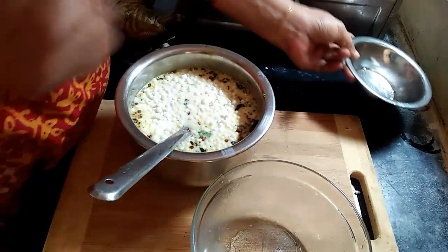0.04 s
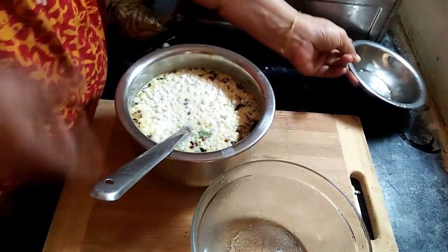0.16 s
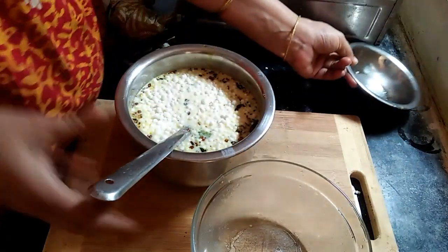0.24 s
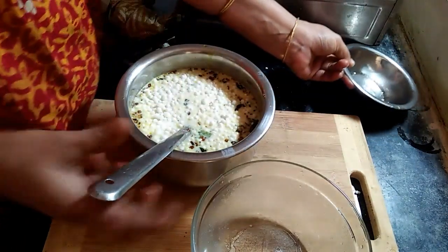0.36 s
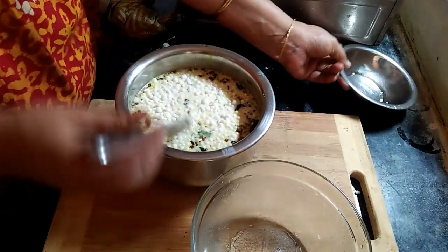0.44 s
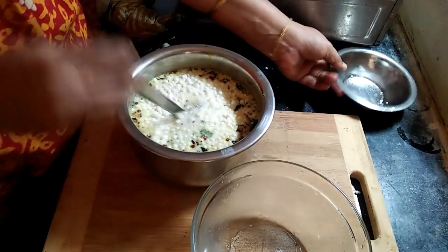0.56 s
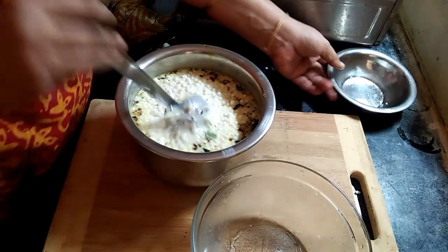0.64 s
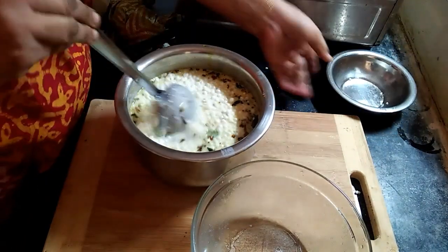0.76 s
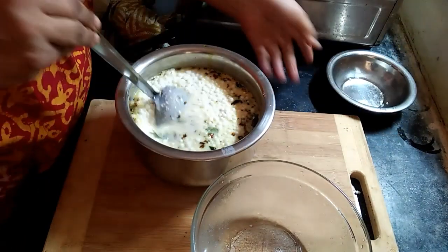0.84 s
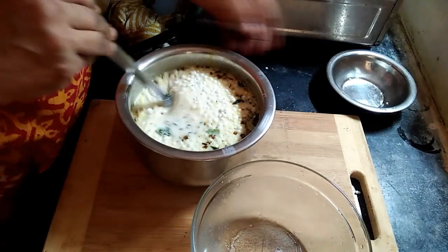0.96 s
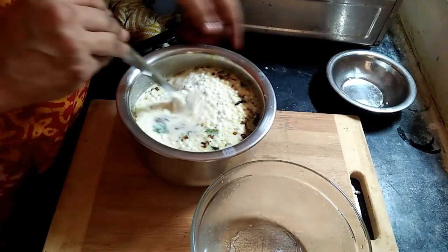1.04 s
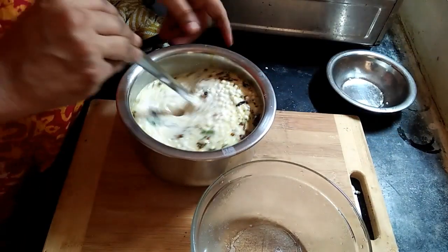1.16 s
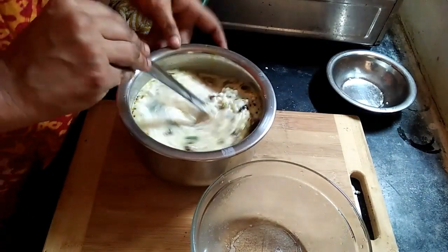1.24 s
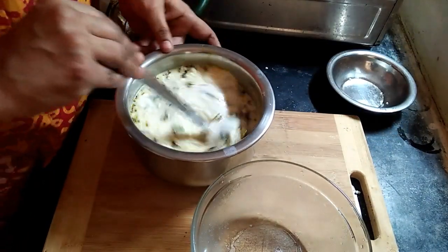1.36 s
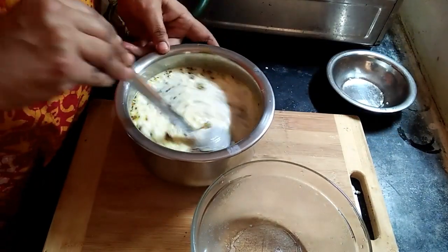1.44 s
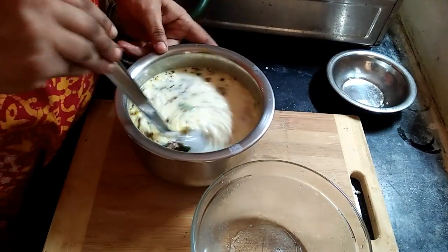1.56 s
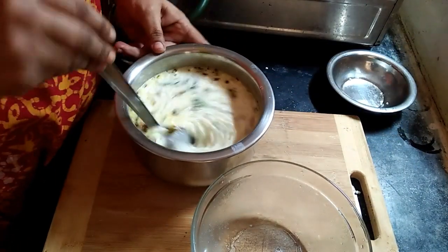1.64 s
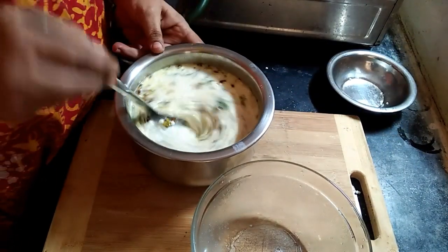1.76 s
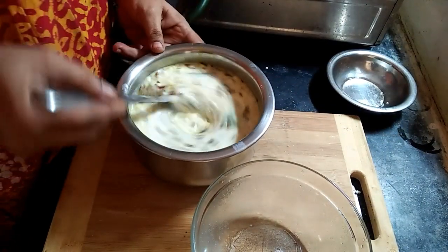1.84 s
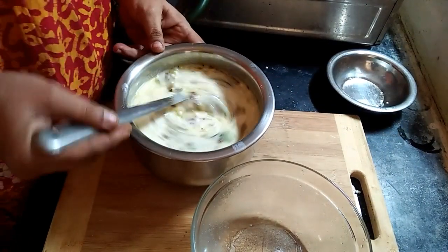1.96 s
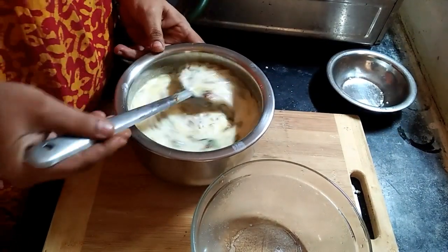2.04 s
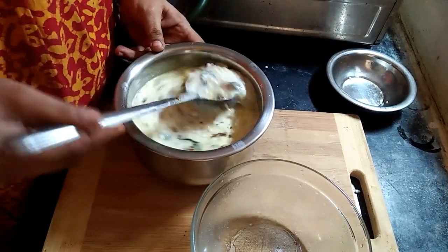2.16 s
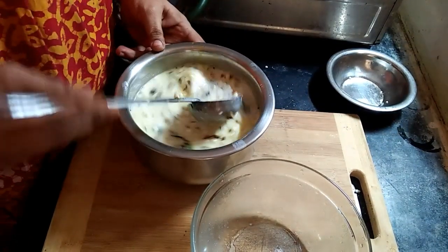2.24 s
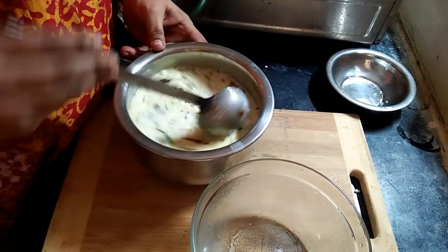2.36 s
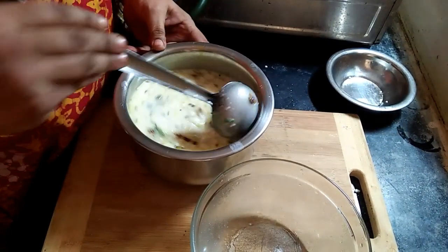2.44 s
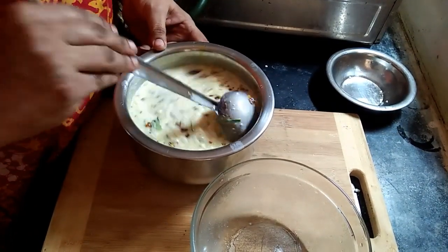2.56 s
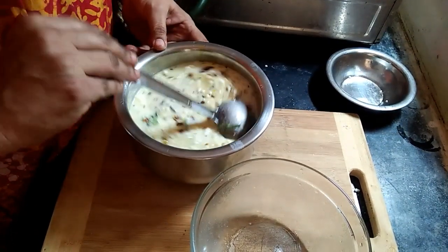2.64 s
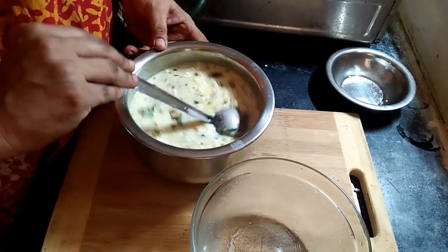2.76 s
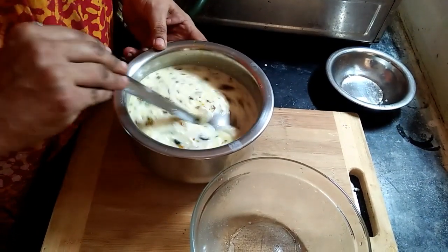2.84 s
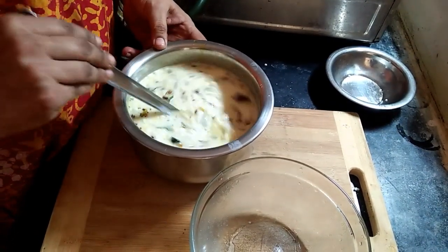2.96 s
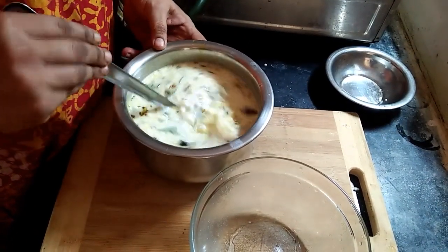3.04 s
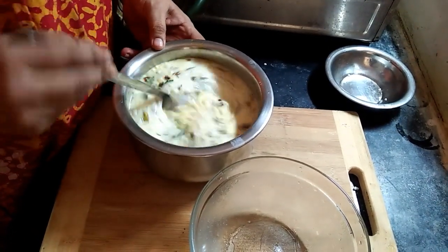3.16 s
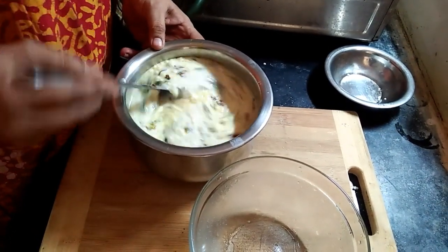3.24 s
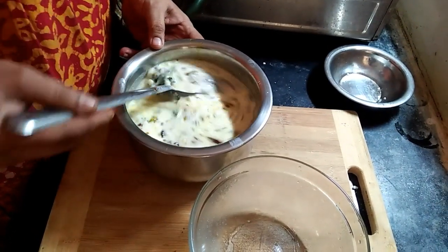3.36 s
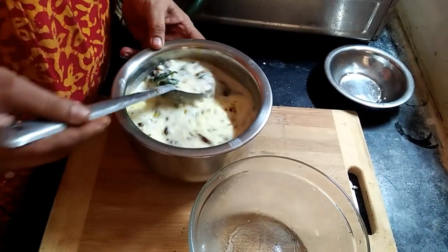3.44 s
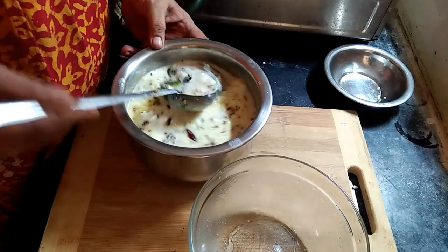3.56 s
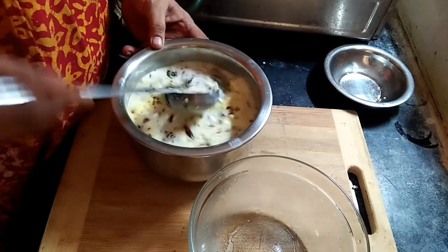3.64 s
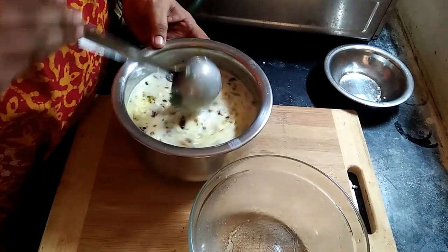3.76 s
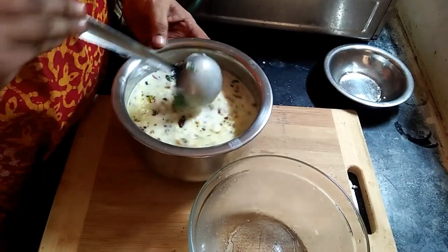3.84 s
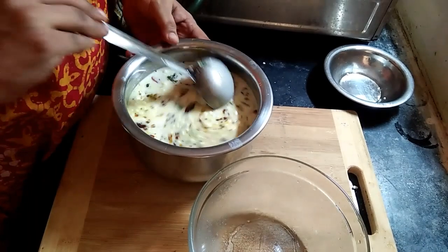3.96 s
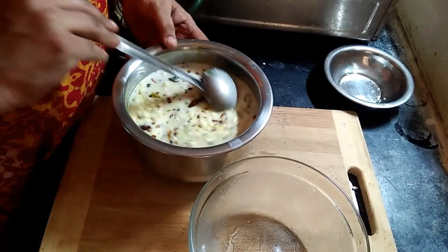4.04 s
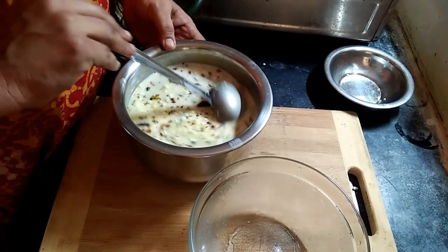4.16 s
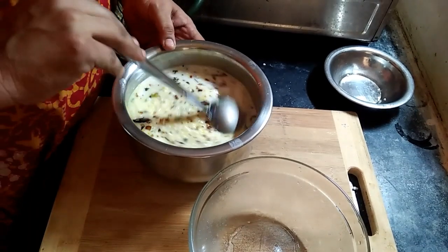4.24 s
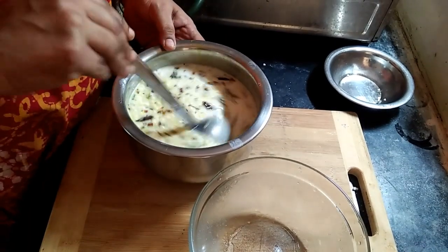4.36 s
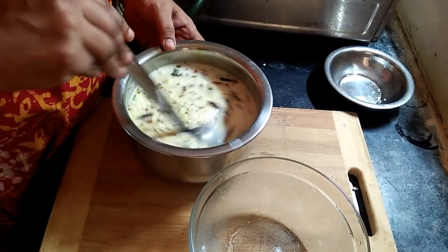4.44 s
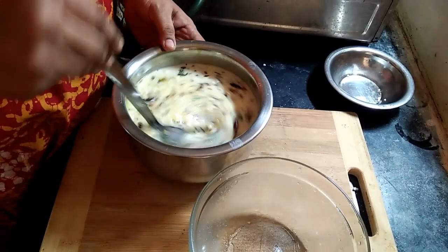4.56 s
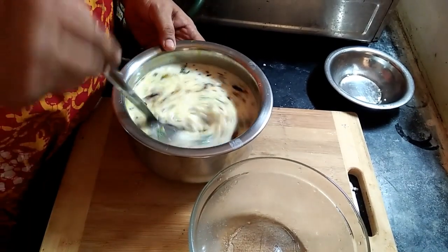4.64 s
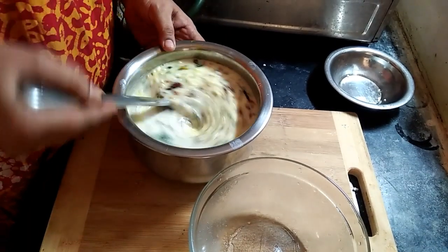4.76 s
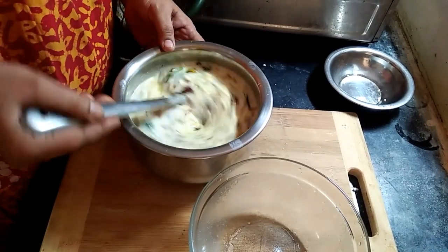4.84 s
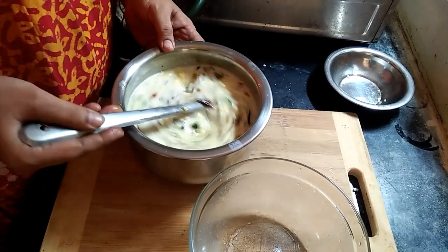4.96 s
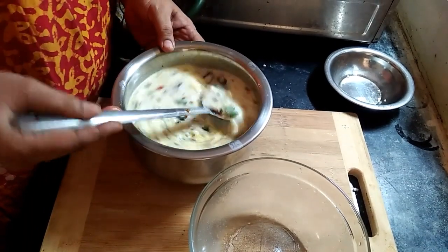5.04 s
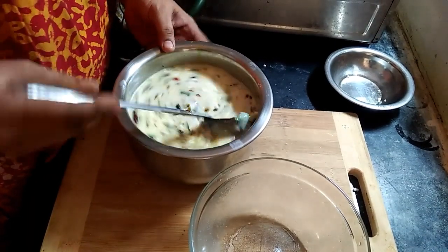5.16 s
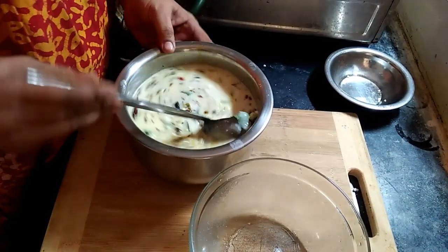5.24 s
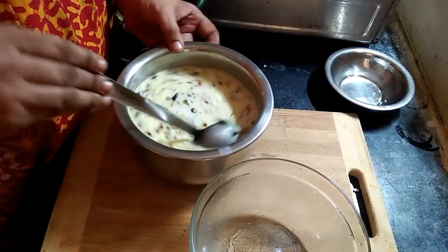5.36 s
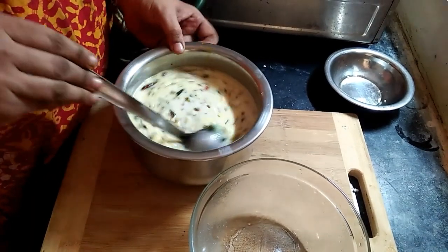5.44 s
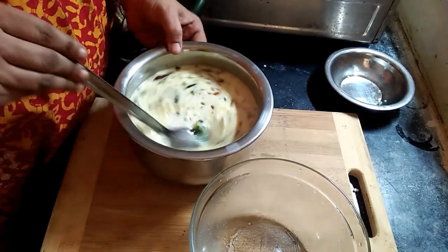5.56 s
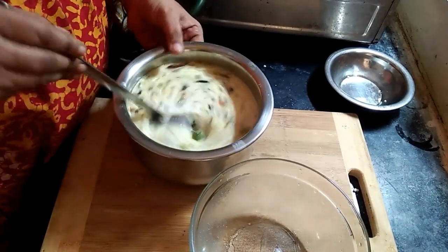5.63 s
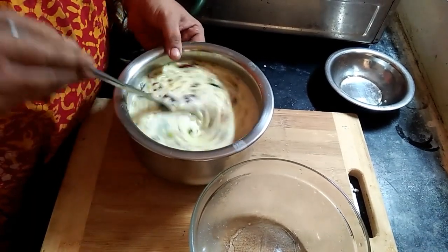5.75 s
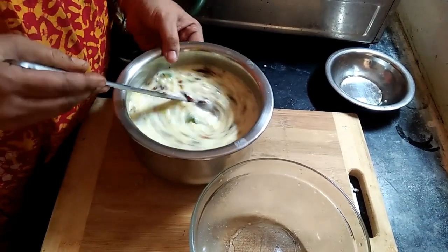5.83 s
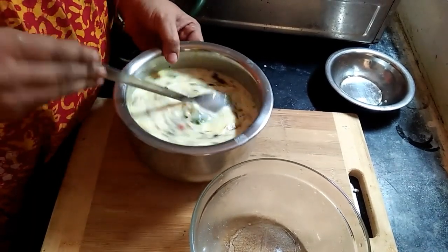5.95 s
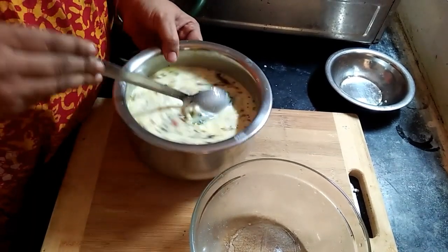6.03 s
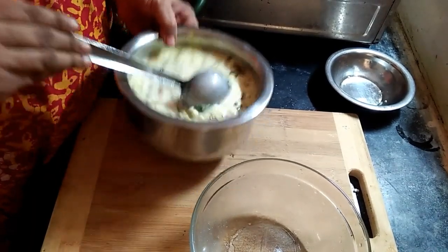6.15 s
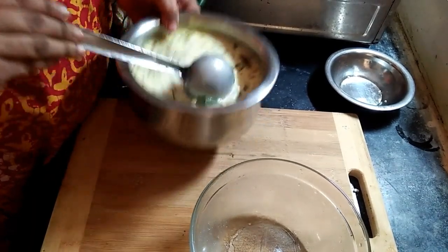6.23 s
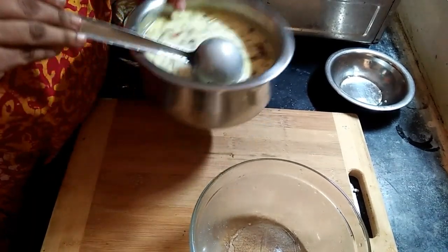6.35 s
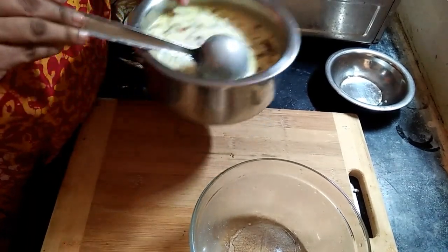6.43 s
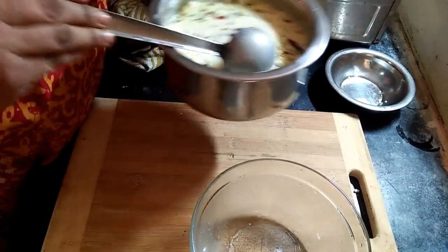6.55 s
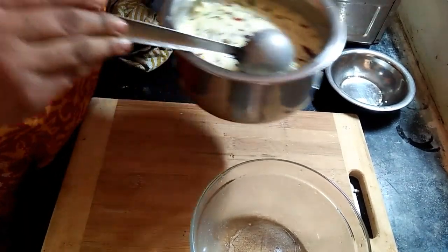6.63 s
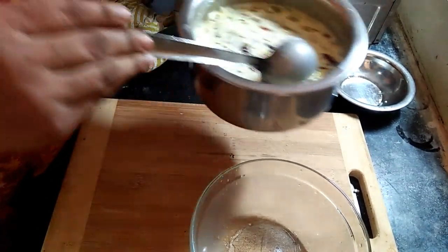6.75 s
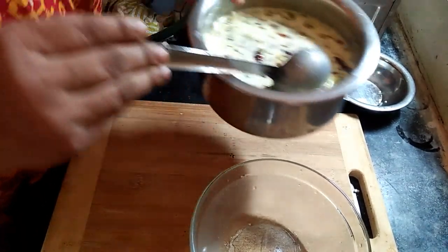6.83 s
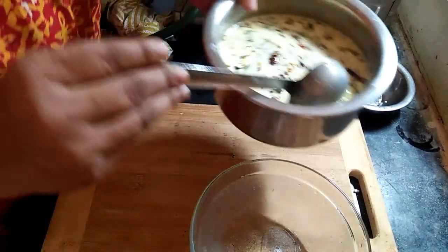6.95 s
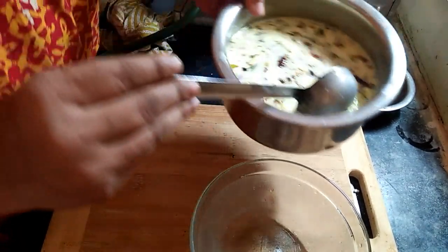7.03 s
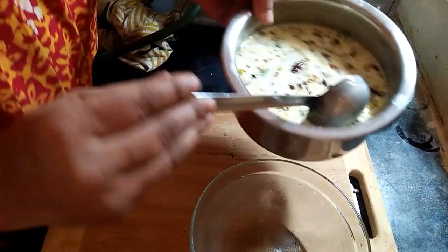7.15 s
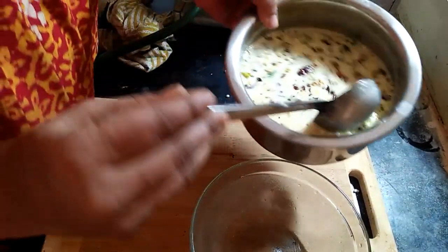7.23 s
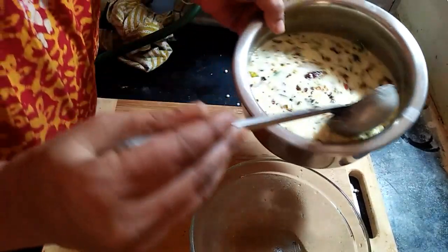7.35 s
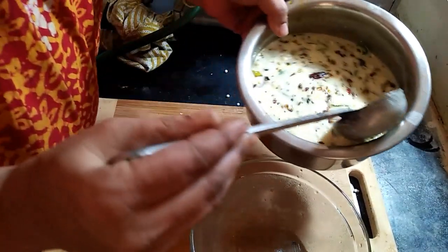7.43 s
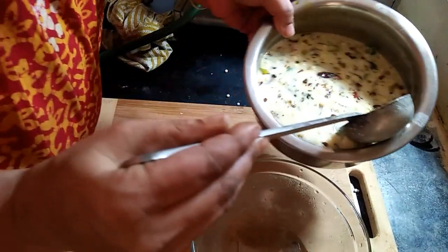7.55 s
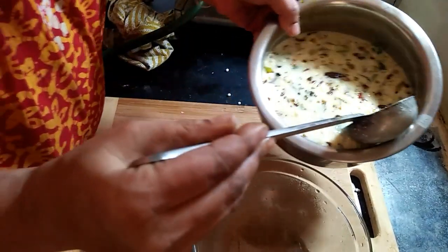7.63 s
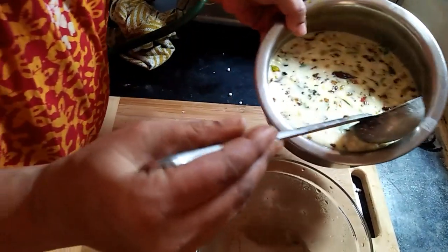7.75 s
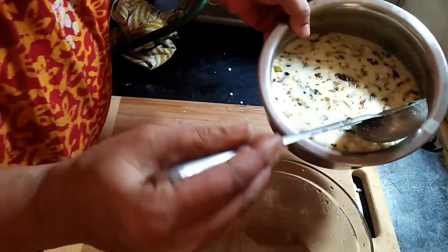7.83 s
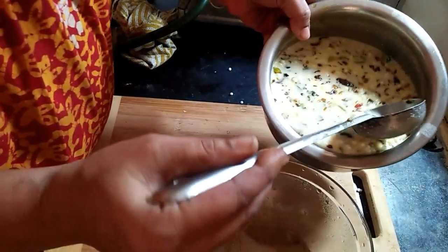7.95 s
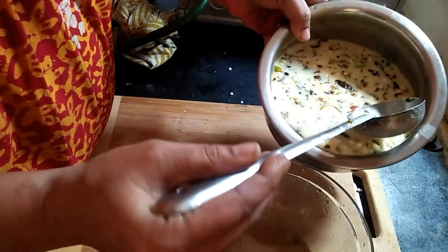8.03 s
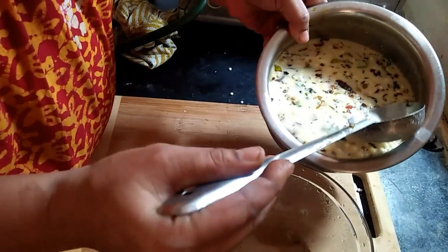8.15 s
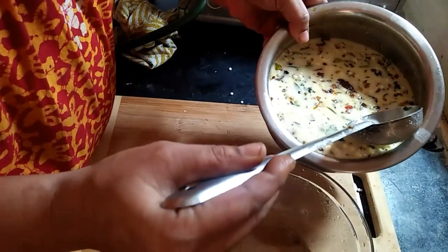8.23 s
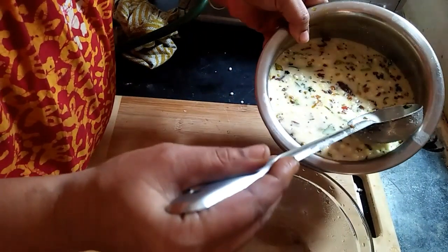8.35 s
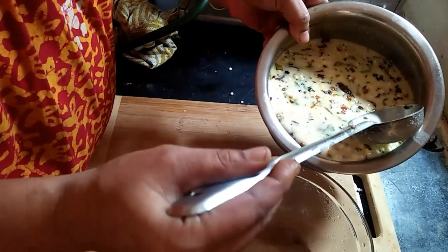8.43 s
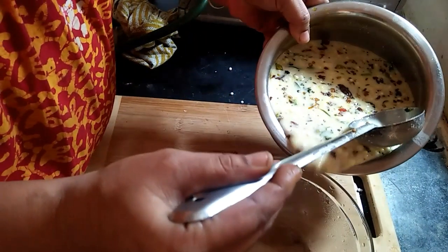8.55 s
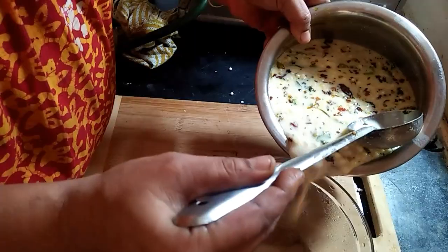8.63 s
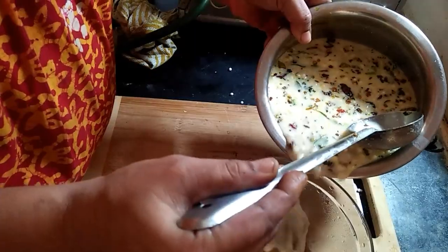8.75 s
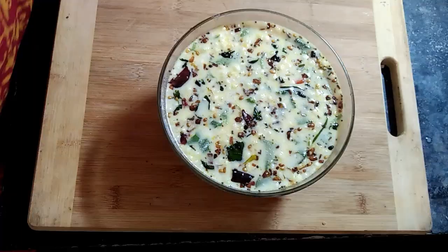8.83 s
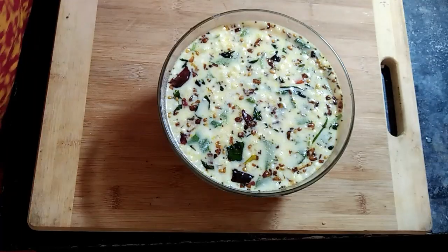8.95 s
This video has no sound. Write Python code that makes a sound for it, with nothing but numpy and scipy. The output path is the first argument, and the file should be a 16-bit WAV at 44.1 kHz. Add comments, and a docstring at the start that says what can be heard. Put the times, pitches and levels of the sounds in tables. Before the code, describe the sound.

Soft sleeve rustle, then a small empty steel dish lands with a rapid ringing clatter. A steel ladle knocks a full pot and stirs thin curry with gritty scrapes, wet plops and swishing, including one hard groaning scrape. It calms, the handle taps the rim, and the lifted pot clunks and clinks before the sound fades. Close microphone in a small hard kitchen, with faint hum and hiss.

```python
"""A rustle of sleeve and hand, then a small steel dish is set down on a counter: decaying modes and short clatter.
A steel ladle stirs thin curry in a steel pot: struck modes knock, rough noise scrapes and groans along the wall,
gliding sine bubbles plop and dribble, and coloured noise washes. The handle taps the rim; late on the pot,
in the hand, clunks as it is tipped to pour and the stem slides on the rim.
Decaying noise echoes it as a small hard room over hum, rumble and hiss; everything fades out at the end."""
import sys
import numpy as np
from scipy import signal
from scipy.fft import rfft, irfft, next_fast_len
from scipy.io import wavfile
from scipy.ndimage import uniform_filter1d

SR = 44100
rng = np.random.default_rng(int(sys.argv[2]) if len(sys.argv) > 2 else 0)


def generate_wav(signal):
    """Clip the signal to [-1, 1] and save it as 16-bit WAV at the path in sys.argv[1]."""
    frames = np.transpose(np.atleast_2d(signal))
    scaled = np.clip(frames, -1, 1) * 32767
    pcm = np.round(scaled).astype(np.int16)
    wavfile.write(sys.argv[1], SR, pcm)


N = 396190
T = np.arange(N) / SR

# Ring modes of the full pot on its board: f/Hz, relative level/dB, full-length t60/s
POT_MODES = [(313, -23.5, 1), (433, -35.5, 0.23), (622, -12, 0.22), (657, -18.5, 0.22), (896, 0, 0.39),
             (1065, -20.5, 0.16), (1220, -5, 0.11), (1447, -18, 0.3), (1650, -18.5, 0.11),
             (2124, -1.5, 0.22), (2310, -6, 0.16), (2510, -23, 0.097), (3070, -28, 0.24),
             (3970, -36.5, 0.15), (5300, -37, 0.29), (5630, -39.5, 0.2), (5770, -32.5, .25),
             (7340, -35.5, .25), (8600, -39, .22), (10000, -34, 0.27), (9750, -34, .2)]
# Bending modes of the ladle's stem, damped by the hand: f/Hz, relative level/dB, full-length t60/s
STEM_MODES = [(1484, -2, 0.26), (1596, -4.5, .18), (2770, -9.5, 0.29), (4180, -10, .24),
              (4230, -15.5, 0.16), (5940, -14, 0.16), (5680, -20.5, 0.36), (9700, -25, 0.25),
              (11410, -21, 0.16), (11400, -27, .17)]
# Low background: t/s, hum level/dB, rumble level/dB
LOW_LEVELS = [(0, -62, -61), (.6, -61, -64), (1.3, -66, -70), (2.1, -72, -75), (2.8, -65, -68),
              (3.5, -66, -70), (4.3, -64, -63), (4.9, -59, -65), (5.8, -65, -68), (6.3, -73, -74),
              (6.7, -62, -72), (7.3, -61, -73), (7.7, -69, -72), (8.6, -60, -68)]


def undb(db):
    """Decibels to gain."""
    return 10 ** (np.asarray(db) / 20)


def unit(x):
    """Scale to rms 1."""
    return x / np.sqrt(np.mean(x ** 2))


def curve(rows, axis=1):
    """Draw one column of a (t/s, ..) table as a line through every sample."""
    rows = np.array(rows)
    return np.interp(T, rows[:, 0], rows[:, axis])


def add(out, s, x):
    """Mix x in from time s on."""
    i = int(s * SR)
    out[i:i + len(x)] += x[:N - i]


def colour(x, points, tilt_db=0):
    """Filter by a (f/Hz, level/dB) spectrum with an extra tilt per octave; causal, rms 1."""
    hz, db = np.transpose(points)
    size = 2 * next_fast_len(len(x) // 2 + 1, True)
    octave = np.log2(np.maximum(np.fft.rfftfreq(size, 1 / SR), 1))
    gain_db = np.interp(octave, np.log2(hz), db + tilt_db * np.log2(hz / hz[0]))
    gain_db -= 20 * np.maximum(np.log2(hz[0]) - octave, 0)  # roll-off below the lowest point
    # folding the cepstrum gives minimum phase, so nothing sounds ahead of its cause
    cepstrum = irfft(np.log(undb(gain_db)))
    cepstrum[1:size // 2] *= 2
    cepstrum[size // 2 + 1:] = 0
    response = np.exp(rfft(cepstrum))
    return unit(irfft(rfft(x, size) * response)[:len(x)])


def noise(points, tilt_db=0, size=N):
    """Coloured noise, rms 1."""
    return colour(rng.standard_normal(size), points, tilt_db)


def decay(t, t60):
    """Falls 60 dB in t60 seconds."""
    return np.exp(-np.log(1000) * t / max(t60, 1 / SR))


def swell(s, rise, t60):
    """Builds to a crest at time s, then dies away."""
    build = np.exp(-(np.minimum(T - s, 0) / rise) ** 2)
    return build * decay(np.clip(T - s, 0, 2), t60)


def walk(rate):
    """Slow chance with a spread near 1, turning at random points, rate of them a second."""
    knots = rng.standard_normal(1024)
    return np.interp(T * rate, np.arange(len(knots)), knots)


def ring(modes, t, length=1, tilt_db=0):
    """Decaying partials; a harder contact tilts them up, a longer contact damps them."""
    total = np.zeros(len(t))
    for hz, db, t60 in modes:
        level = undb(db + tilt_db * np.log2(hz / 1000))
        total += level * decay(t, t60 * length) * np.sin(2 * np.pi * hz * t)
    return total


def blows(hits, modes, spectrum, contact_s=0.00084):
    """Each blow starts the long ring and a short clatter of crowded modes, returned as two layers."""
    rings, clatter, t = np.zeros(N), np.zeros(N), T[:SR]
    push = 1 - np.exp(-t / contact_s)
    for s, ring_db, length, ring_tilt_db, clatter_db, t60, tilt_db in hits:
        add(rings, s, undb(ring_db) * push * ring(modes, t, length, ring_tilt_db))
        crowded = noise(spectrum, tilt_db, size=SR)
        add(clatter, s, undb(clatter_db) * push * decay(t, t60) * crowded)
    return np.array([rings, clatter])


def dish_blows():
    """The empty steel dish lands in a few quick blows that excite its modes."""
    # Ring modes: f/Hz, relative level/dB, full-length t60/s
    modes = [(330, -21.5, 0.35), (729, -5, 0.59), (1255, -15, 0.3), (1324, -5, 0.29), (2147, -11.5, 0.2),
             (2690, -27.5, 0.11), (4624, -53.5, 0.15), (5217, -35, 0.38), (6070, -33, 0.24),
             (6455, -37, 0.33), (7768, -50, 0.32), (9080, -39, 0.28), (9905, -44, 0.23), (9600, -41, 0.23),
             (11000, -36, 0.18), (11650, -44, 0.27), (13000, -46.5, 0.26), (13790, -40, 0.17)]
    # Clatter spectrum: f/Hz, relative level/dB
    spectrum = [(120, -68), (200, -55.5), (328, -14), (579, -21.5), (722, -8.5), (821, -17.5),
                (1230, -10.5), (1320, -1.5), (1420, -6.5), (1870, -24), (2170, -9), (3190, -35),
                (7410, -48), (10900, -45.5), (16000, -50)]
    # Blows: t/s, ring level/dB, ring length/share of t60, ring tilt/dB per octave,
    # clatter level/dB, clatter t60/s, clatter tilt/dB per octave
    hits = [(.376, -47.5, 1, -12, -46.5, 0.04, 0), (.383, -23.5, 1, 0, -26.5, 0.19, 1),
            (.392, -31.5, 1, 1, -34, 0.1, -1), (.403, -45, 0.81, 1.5, -31, .08, 3.5),
            (.417, -31, 0.74, 0, -34, 0.092, -5.5), (.4245, -27.5, 0.93, -0.5, -32.5, 0.12, 1),
            (.4305, -26.5, 1, 2, -41.5, 0.23, 5.5)]
    return blows(hits, modes, spectrum)


def pot_blows():
    """Knocks on the full pot on its board ring the pot's own modes."""
    # Clatter spectrum: f/Hz, relative level/dB
    spectrum = [(200, -37), (340, -2.5), (400, -13), (620, -5.5), (900, 6), (1250, 4.5), (1800, -10),
                (2200, -3.5), (3200, -23), (4300, -27.5), (7500, -28), (13000, -26.5), (16000, -39.5)]
    # Blows: t/s, ring level/dB, ring length/share of t60, ring tilt/dB per octave,
    # clatter level/dB, clatter t60/s, clatter tilt/dB per octave
    hits = [(.777, -66, 0.45, 13, -45.5, 0.14, 5), (.7905, -26.5, 0.77, 1, -28, 0.15, 1.5),
            (.808, -46, 0.91, 4, -35, 0.13, -3), (1.0425, -39, 0.24, 4.5, -39.5, 0.061, 4),
            (1.483, -55, 0.5, -6.5, -48, 0.033, 0.5), (4.739, -52, 0.76, -4.5, -51, 0.038, -11),
            (5.472, -58.5, 0.52, -2.5, -55.5, 0.093, -2.5), (6.279, -64.5, 0.46, 2.5, -56, 0.12, -2),
            (6.714, -67.5, 0.38, -6, -60, 0.051, 5)]
    return blows(hits, POT_MODES, spectrum)


def held_pot_blows():
    """In the hand the pot has another set of modes, heard as it clunks when tipped to pour."""
    # Ring modes: f/Hz, relative level/dB, full-length t60/s
    modes = [(329, -5.5, 0.57), (433, -4.5, 0.63), (610, -17.5, 0.48), (739, -1, 1.49), (865, -11.5, 0.18),
             (950, 4, 0.16), (1532, -7.5, 1.54), (1574, -24, 0.32), (2660, -23.5, 0.57), (3300, -42, 0.74),
             (4095, -31, 0.68), (4620, -34, 0.817), (5370, -41, 1.5), (5700, -33, 0.41), (7000, -51, 0.34),
             (8489, -53.5, .7), (10400, -36, 0.41), (11300, -44, 0.35), (11900, -40.5, 0.46)]
    # Clatter spectrum: f/Hz, relative level/dB
    spectrum = [(200, -38), (330, -19), (380, -10), (440, -12.5), (530, -14), (640, 4), (940, 0.5),
                (1300, -15.5), (1750, -12), (2300, -34.5), (4200, -39.5), (13000, -49), (16000, -51)]
    # Blows: t/s, ring level/dB, ring length/share of t60, ring tilt/dB per octave,
    # clatter level/dB, clatter t60/s, clatter tilt/dB per octave
    hits = [(7.522, -68, 0.15, 2, -27, 0.026, -11), (7.5285, -44, 0.58, 2.5, -21, 0.074, 0),
            (7.549, -54.5, 0.54, -6, -40, 0.041, 1), (7.558, -61, 0.16, -3, -43.5, 0.063, 4),
            (7.586, -67, 0.19, -9, -40, 0.048, 2), (8.046, -58, 0.048, -20, -51, .04, -1),
            (8.0525, -31.5, 0.24, 3.5, -38.5, 0.3, 3.5), (8.076, -37, 0.14, -0.5, -55.5, 0.07, -1),
            (8.471, -46.5, 0.16, -2.5, -47.5, 0.14, 2.5)]
    return blows(hits, modes, spectrum)


def ladle_blows():
    """The ladle's cup answers its own knocks with mostly short modes."""
    # Ring modes: f/Hz, relative level/dB, full-length t60/s
    modes = [(1000, -2.5, 0.56), (1140, 1.5, 0.072), (1240, -3.5, .16), (1620, -16, .08), (2500, -14, .08),
             (4140, -16.5, .08), (5600, -14.5, .12), (6450, -11.5, 0.11), (7240, -16.5, .12)]
    # Clatter spectrum: f/Hz, relative level/dB
    spectrum = [(200, -37.5), (480, -28.5), (680, -21), (1000, 12.5), (1230, 7), (1550, -9), (2200, -10),
                (3100, -12), (4300, -13.5), (5600, -6.5), (6900, -8.5), (7700, -21.5), (13000, -26.5),
                (16000, -33)]
    # Blows: t/s, ring level/dB, ring length/share of t60, ring tilt/dB per octave,
    # clatter level/dB, clatter t60/s, clatter tilt/dB per octave
    hits = [(1.585, -65, 0.84, 7, -54, 0.024, 5), (1.7235, -45.5, 0.66, 1.5, -23.5, 0.049, 0),
            (3.244, -51.5, .4, -7, -27.5, 0.024, 0.5), (3.2495, -70, 0.6, 5, -39.5, 0.018, 0.5),
            (6.279, -57, 1, -10, -58, 0.4, -8)]
    return blows(hits, modes, spectrum)


def stem_blows():
    """Knocks set off the bending modes of the ladle's stem."""
    # Clatter spectrum: f/Hz, relative level/dB
    spectrum = [(500, -33.5), (1300, -10), (1580, 19.5), (1950, 4.5), (2500, -13), (2750, 6), (3100, -20),
                (3850, -12.5), (4200, -11), (4700, -29.5), (5350, -9), (5780, 2), (6500, -22.5),
                (9000, -11), (11400, -9), (16000, -34)]
    # Blows: t/s, ring level/dB, ring length/share of t60, ring tilt/dB per octave,
    # clatter level/dB, clatter t60/s, clatter tilt/dB per octave
    hits = [(1.0425, -43, 0.37, 3, -37.5, 0.079, -7), (1.585, -77.5, 0.47, 3, -53, 0.12, 13.5),
            (8.0525, -27.5, 1, -10.5, -33, 0.12, -0.5), (8.076, -33, 0.62, -16, -43.5, 0.26, -1),
            (8.471, -51.5, 0.99, -4, -47.5, 0.12, -0.5)]
    return blows(hits, STEM_MODES, spectrum)


def rim_blows():
    """The handle taps the rim and sets off short bright modes."""
    # Ring modes: f/Hz, relative level/dB, full-length t60/s
    modes = [(1150, -4, 0.076), (2010, -6, 0.15), (2266, 0, 0.16), (2880, -11.5, 0.14), (3060, -2, 0.12),
             (3175, -12.5, 0.24), (3145, -8, 0.16), (3350, -15.5, 0.18), (5160, -13, .09), (6930, -13, .14)]
    # Clatter spectrum: f/Hz, relative level/dB
    spectrum = [(150, -48), (250, -41), (468, -12.5), (607, -24), (1180, -8.5), (1670, -30.5), (1950, -5.5),
                (2530, -11), (3060, -4), (4410, -31.5), (5350, -18), (7840, -31), (10200, -25.5),
                (14200, -33), (16000, -56)]
    # Blows: t/s, ring level/dB, ring length/share of t60, ring tilt/dB per octave,
    # clatter level/dB, clatter t60/s, clatter tilt/dB per octave
    hits = [(3.944, -71.5, 0.62, 6, -55.5, 0.026, 6), (6.44, -45.5, 0.94, -4, -34, 0.033, 0),
            (6.446, -60.5, .6, 6, -51.5, 0.25, 3), (6.5575, -48.5, 0.45, -1, -47, 0.076, -1.5)]
    return blows(hits, modes, spectrum)


def pressure(start, length, hardest, let_go_t60=0.18, grip_s=0.0063, ease_db=12):
    """One stroke: the steel grips, presses harder, eases off and lets go."""
    t = T - start
    top = length * np.clip(hardest, .05, .95)
    lean = np.interp(t, [0, top, length], [1, 0, 1])  # the ends are ease_db softer than the top
    grip = np.clip(t / grip_s, 0, 1)
    return grip * undb(-ease_db * lean) * decay(np.clip(t - length, 0, 1), let_go_t60)


def wander(x, count=22):
    """As the contact point travels, each narrow band of the steel answers now more, now less."""
    edges = np.geomspace(1200, 16000, count + 1)
    size = 2 ** 19
    spectrum, hz = rfft(x, size), np.fft.rfftfreq(size, 1 / SR)
    band = np.searchsorted(edges[1:-1], hz)
    total = np.zeros(N)
    for k in range(count):
        depth_db = 3.5 * (2500 / max(edges[k], 2500)) ** .4  # shallower in the treble
        total += irfft(spectrum * (band == k))[:N] * undb(depth_db * walk(30))
    return unit(total)


def grit(centre_hz=4400, spread_octaves=.45, count=9000):
    """Spice grains crushed under the ladle: crowded brief pings of scattered pitch and size."""
    out, t = np.zeros(N), T[:SR // 60]
    for when, size, pitch in zip(rng.random(count), rng.random(count), rng.standard_normal(count)):
        hz = centre_hz * 2 ** (spread_octaves * pitch)
        add(out, when * T[-1], size ** 3 * decay(t, .016) * np.sin(2 * np.pi * hz * t))
    return unit(out)


def scrapes(hiss_db=-1, rasp_db=-1, pot_db=-7, grit_db=-8, wall_db=-1, grain_db=4, judder_db=2.5):
    """Steel slips on steel in dense tiny catches that hiss and keep the pot and the stem ringing."""
    # Strokes along the wall: start t/s, length/s, hardest point/share of length,
    # hiss level/dB and rasp level/dB, both ahead of the layer trims
    strokes = [(0.022, 0.14, 0.21, -70.5, -67.5), (0.653, 0.3, 0.08, -70, -74.5),
               (0.954, 0.044, 0, -69, -64), (1.048, .075, 0.17, -53, -51), (1.132, 0.2, 0.4, -72, -74.5),
               (1.344, 0.086, 1, -63, -65), (1.479, 0.34, 0.55, -56.5, -66), (1.763, 0.21, 1, -62.5, -67.5),
               (2.033, 0.12, 0.52, -60.5, -65.5), (2.667, 0.12, 0.91, -64, -66.5),
               (2.866, 0.036, 0.7, -73, -61), (3.009, 0.14, 0.26, -52.5, -59),
               (3.08, 0.35, 0.24, -49.5, -62.5), (3.244, .025, 0.2, -53, -44),
               (3.327, 0.098, 0.36, -82, -58.5), (4.601, 0.24, 0.58, -57, -61.5),
               (4.922, 0.023, 0.4, -66.5, -72), (5.785, 0.084, 0.45, -67.5, -65)]
    # The stem slides on the rim: start t/s, length/s, hardest point/share of length, level/dB,
    # t60/s once the hand stops it
    stem_slide = (8.14, .14, .62, -62.5, .06)
    # Hiss spectrum: f/Hz, relative level/dB
    hiss_colour = [(1200, -30.5), (2800, -19.5), (3250, -1), (3800, 1.5), (4200, 7), (4550, -2.5),
                   (5000, 1.5), (5700, 6), (7200, -1.5), (11000, 4.5), (13700, -1.5), (15800, -14.5)]
    # Rasp spectrum: f/Hz, relative level/dB
    rasp_colour = [(500, -21.5), (900, -8.5), (1250, 0), (1650, 1), (1900, -1), (2300, 7), (2900, -4.5),
                   (4500, -25.5)]
    # Wall resonances that sing under a hard stroke: f/Hz, relative level/dB, t60/s
    wall_modes = [(2870, -3, .035), (3950, -2, .025), (4260, 1, .035), (4420, 2, .05), (4540, -1, .04),
                  (5600, -5, .03), (5920, -5, .04)]
    firm_db, crush = -48, 0.47  # hiss level of a firm stroke; how fast grit and wall grow with pressure

    grain = np.repeat(rng.standard_normal(N // 16 + 1), 16)[:N]  # a new random level every 16 samples
    catches = rng.standard_normal(N) * undb(grain_db * grain)
    catches = wander(catches * undb(judder_db * walk(70)))

    hiss = undb(hiss_db) * colour(catches, hiss_colour)
    pot = unit(signal.fftconvolve(catches, ring(POT_MODES, T[:SR // 2], length=0.69))[:N])
    body = undb(rasp_db) * colour(catches, rasp_colour) + undb(pot_db) * pot
    stem = unit(signal.fftconvolve(catches, ring(STEM_MODES, T[:SR // 2], tilt_db=6))[:N])
    stem += .7 * colour(catches, hiss_colour, tilt_db=9)
    wall = unit(signal.fftconvolve(catches, ring(wall_modes, T[:SR // 8]))[:N])

    bright, rough = np.zeros(N), np.zeros(N)
    for start, length, hardest, high_db, mid_db in strokes:
        press = pressure(start, length, hardest)
        bright += undb(high_db) * press
        rough += undb(mid_db) * press
    # a harder press crushes more grains and makes the wall sing more
    crushed = (bright / undb(firm_db)) ** crush * (undb(grit_db) * grit() + undb(wall_db) * wall)
    start, length, hardest, slide_db, t60 = stem_slide
    slide = pressure(start, length, hardest, t60) * undb(slide_db) * stem
    return bright * (hiss + crushed) + rough * body + slide


def groans():
    """The ladle grips and slips in step with one mode of the pot: it swells, then rings out."""
    # Groans: crest t/s, f/Hz, level/dB, swell/s, t60/s
    squeals = [(1.048, 612, -40, 0.0024, 0.15), (3.135, 889, -48.5, .012, 0.11),
               (3.171, 889, -39, .009, 0.11), (3.255, 889, -22, .004, .1), (3.266, 889, -26, .007, .06),
               (3.299, 889, -34, .009, 0.14), (3.348, 889, -44, .01, 0.08), (4.744, 883, -46, 0.004, 0.09)]
    return sum(undb(db) * swell(s, rise, t60) * np.sin(2 * np.pi * hz * T)
               for s, hz, db, rise, t60 in squeals)


def bubble(t, hz, t60, rise):
    """An air pocket rings and glides in pitch; its changing shape makes the pitch unsteady."""
    wobble = .05 * unit(uniform_filter1d(rng.standard_normal(len(t)), size=90))  # octaves
    pitch_hz = hz * 2 ** (wobble + rise * np.minimum(t, t60))
    return decay(t, t60) * np.sin(2 * np.pi * np.cumsum(pitch_hz) / SR)


def plops(splash_t60=0.085, open_s=0.00067):
    """Pockets of air close behind the ladle, or drips fall from it: single bubbles, each with a small splash."""
    # Plops: t/s, level/dB, starting f/Hz, t60/s, rise/octaves per s (negative falls),
    # splash level/dB relative to the bubble's gain
    pockets = [(1.017, -51, 2510, .05, -5.5, -6), (1.245, -51.5, 1720, 0.095, 4, -28),
               (1.362, -45.5, 2235, 0.087, 6, -30), (1.797, -41.5, 1880, .03, -9, -17),
               (1.964, -36.5, 2040, 0.026, -2, -35), (2.298, -61, 1740, 0.056, -1, -5),
               (2.625, -49, 935, 0.1, 4.5, -11), (2.819, -52.5, 723, 0.25, 1, -3.5),
               (2.871, -44, 443, 0.11, -2, 0), (2.982, -36.5, 1010, 0.17, 11, -16.5),
               (3.005, -42, 1492, 0.11, 10, -5.5), (3.19, -46.5, 1340, 0.037, 1.5, -8.5),
               (3.251, -27.5, 1620, 0.031, 2, -15), (3.945, -49, 1600, 0.11, -1, -20),
               (4.523, -53, 610, 0.2, -0.5, -7), (4.865, -53.5, 2000, 0.025, -3, -6),
               (5.472, -49.5, 1063, 0.087, -1, -10)]
    splash_colour = [(350, -11), (900, 6.5), (1500, -6.5), (2400, -5), (3500, -19.5), (14000, -31.0)]
    out, t = np.zeros(N), T[:SR // 4]
    opening = 1 - np.exp(-t / open_s)
    for s, db, hz, t60, rise, splash_db in pockets:
        splash = undb(splash_db) * decay(t, splash_t60) * noise(splash_colour, size=len(t))
        add(out, s, undb(db) * opening * (bubble(t, hz, t60, rise) + splash))
    return out


def dribbles(spread_octaves=.17, t60=.03, rise=3, count=160):
    """Curry runs off the ladle: each dribble is a swelling crowd of bubbles of much the same pitch."""
    # Dribbles: crest t/s, level/dB, centre f/Hz, build-up/s, t60/s
    runs = [(1.17, -66.5, 1650, .04, 0.62), (1.39, -73, 2500, 0.038, .25),
            (4.055, -59.5, 1544, 0.018, 0.21), (4.03, -67, 677, 0.045, .5), (4.29, -68, 1150, 0.017, 0.46),
            (5.81, -69.5, 1990, 0.12, 0.77), (6.29, -60, 950, 0.0077, 0.2)]
    out, t = np.zeros(N), T[:SR // 20]
    for s, db, hz, build, fall in runs:
        crowd = np.zeros(SR // 2)
        for when, size, pitch in zip(rng.random(count), rng.random(count), rng.standard_normal(count)):
            drop_hz = hz * 2 ** (spread_octaves * pitch)
            add(crowd, when * .44, size * bubble(t, drop_hz, t60, rise))
        run = np.zeros(N)
        add(run, s - .2, unit(crowd))  # the crowd starts ahead of the crest
        out += undb(db) * run * swell(s, build, fall)
    return out


def sloshing(rise_s=0.11, t60=1.7, calm_db=-79):
    """Strength of the wash: each push raises a surge that slowly settles to the calm level."""
    # Pushes of ladle or pot: crest t/s, level/dB
    pushes = [(.8, -62.5), (1.9, -65), (2.78, -67.5), (3.2, -57.5), (4.28, -75.5), (4.721, -64), (5.3, -70),
              (5.64, -66.5), (6.45, -73.5), (7.3, -79.5), (7.9, -75), (8.12, -65.5)]
    surges = [undb(db) * swell(s, rise_s, t60) for s, db in pushes]
    return np.sqrt(undb(calm_db) ** 2 + np.sum(np.square(surges), axis=0))


def swirl(wash_db=1, bubbles_db=-8, count=1200):
    """The curry washes round the pot as fluttering noise, with many tiny bubbles."""
    # Wash spectrum: f/Hz, relative level/dB
    wash_colour = [(200, -24.5), (330, -7.5), (440, 4), (520, -20), (610, 10), (690, -5.5), (880, 9.5),
                   (1030, 0.5), (1160, 5.5), (1450, -8), (2200, -13), (3000, -33.5), (8000, -41.5)]
    bubbles, t = np.zeros(N), T[:SR // 20]
    for when, pitch, size in rng.random((count, 3)):
        add(bubbles, when * T[-1], size ** 4 * bubble(t, 550 * 3 ** pitch, .035, 3))
    wash = noise(wash_colour) * undb(2 * walk(18) + 2 * walk(8.9))
    return sloshing() * (undb(wash_db) * wash + undb(bubbles_db) * unit(bubbles))


def thuds(rise_s=0.004, t60=0.29):
    """Short low booms of counter, board and pot as dish or pot are handled."""
    # Thuds: t/s, level/dB
    bumps = [(0.633, -51.5), (3.253, -42.5), (7.531, -45.5), (8.05, -52)]
    # Boom spectrum: f/Hz, relative level/dB
    boom_colour = [(45, -12), (85, 0), (125, -14), (200, -30.5), (400, -52)]
    return noise(boom_colour) * sum(undb(db) * swell(s + rise_s, rise_s, t60) for s, db in bumps)


def rustle():
    """Sleeve and hand rub as the dish is carried: soft coloured noise that dies down."""
    # Rustle: t/s, level/dB
    levels = [(0, -59.5), (.3, -59.5), (.45, -67), (.7, -73.5), (1.0, -78.5), (1.3, -110)]
    # Rustle spectrum: f/Hz, relative level/dB
    cloth_colour = [(76, -30), (130, -7.5), (225, -14.5), (292, 2.5), (434, -2), (522, -12.5), (700, -4.5),
                    (900, -1.5), (1100, -5), (1300, -15), (2290, -17), (5000, -51), (6500, -76),
                    (11000, -120)]
    return undb(curve(levels)) * noise(cloth_colour)


def kitchen(x, low_t60=0.32, high_t60=0.1, split_hz=2500, high_db=-4, gap_s=0.0023):
    """Diffuse echo of a small hard room; the treble dies first."""
    t = T[:SR // 2]
    scatter = rng.standard_normal(len(t))
    low = signal.sosfilt(signal.butter(2, split_hz, fs=SR, output="sos"), scatter)
    high = signal.sosfilt(signal.butter(2, split_hz, "high", fs=SR, output="sos"), scatter)
    echo = low * decay(t, low_t60) - undb(high_db) * high * decay(t, high_t60)
    echo *= t > gap_s
    return signal.fftconvolve(x, echo / np.sqrt(np.sum(decay(t, low_t60) ** 2)))[:N]


def wavering(hz):
    """A tone whose two quadrature parts swell and vanish at random, rms 1."""
    return unit(walk(7) * np.sin(2 * np.pi * hz * T) + walk(7) * np.cos(2 * np.pi * hz * T))


def hum(drone_hz=49.8, octave_db=-8):
    """A low wavering drone with its octave."""
    tones = unit(wavering(drone_hz) + undb(octave_db) * wavering(2 * drone_hz))
    return tones * undb(curve(LOW_LEVELS))


def rumble(flutter_db=3):
    """Low noise whose level flutters at random."""
    # Rumble spectrum: f/Hz, relative level/dB
    low_colour = [(25, -20), (55, -15), (75, 1.5), (98, 4.5), (130, -3.5), (170, -10), (240, -31),
                  (400, -50.5)]
    return noise(low_colour) * undb(curve(LOW_LEVELS, axis=2) + flutter_db * walk(9))


def air(level_db=-77.5):
    """Faint steady hiss of coloured noise."""
    # Hiss spectrum: f/Hz, relative level/dB
    air_colour = [(100, -7), (300, 0.5), (1000, -11), (2000, -11.5), (4000, -19), (8000, -22), (13500, -26),
                  (16000, -26)]
    return undb(level_db) * noise(air_colour)


def scene(echo_db=-6, ring_echo_db=-20, scrape_echo_db=-14):
    """Steel and liquid in the room, over the background."""
    struck = [dish_blows(), pot_blows(), held_pot_blows(), ladle_blows(), stem_blows(), rim_blows()]
    rings, clatter = sum(struck)
    rings = rings + groans()
    short = clatter + plops() + dribbles()
    rubbing = scrapes()
    echo = kitchen(undb(echo_db) * short + undb(ring_echo_db) * rings + undb(scrape_echo_db) * rubbing)
    near = rings + short + rubbing + swirl() + thuds() + rustle()
    return (near + echo + hum() + rumble() + air())[None]


def record(dry, top_hz=15700):
    """The sound fades out at the end and a steep low-pass cuts the top."""
    # Fade, held at its first level until it starts: t/s, level/dB
    fade = [(7.6, -2), (8.2, -9.5), (8.5, -10), (8.68, -15.5), (8.8, -35.5), (8.9, -64)]
    low_pass = signal.ellip(8, .2, 70, top_hz, fs=SR, output="sos")
    return signal.sosfilt(low_pass, dry * undb(curve(fade)))


dry = scene()
out = record(dry)
generate_wav(out)
```